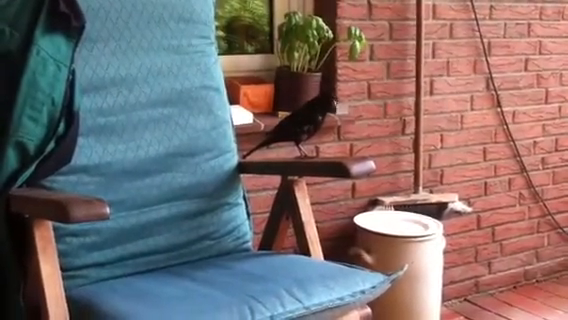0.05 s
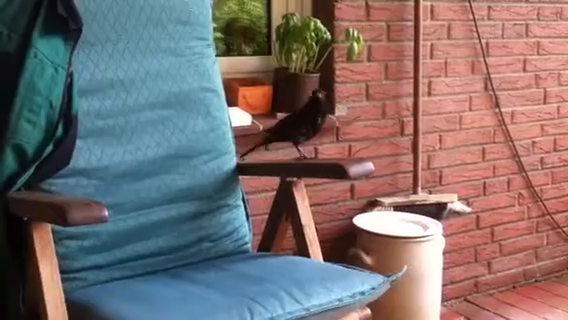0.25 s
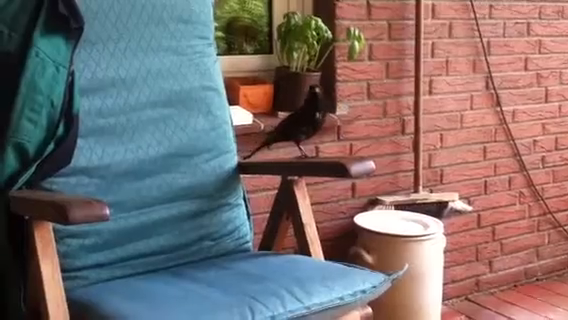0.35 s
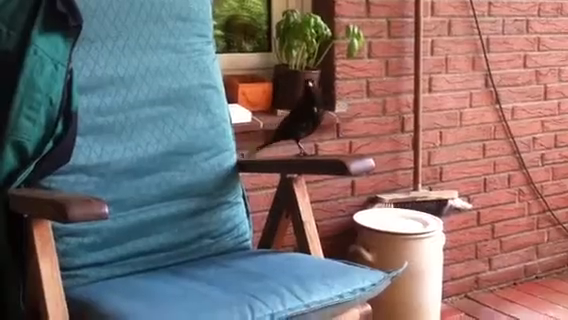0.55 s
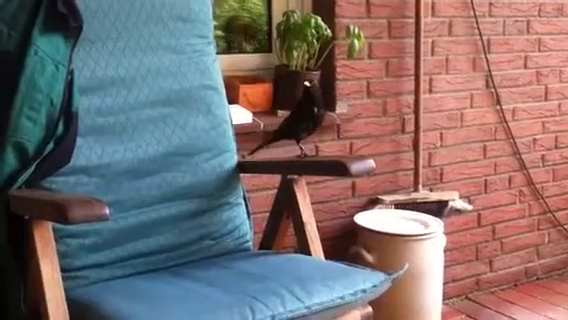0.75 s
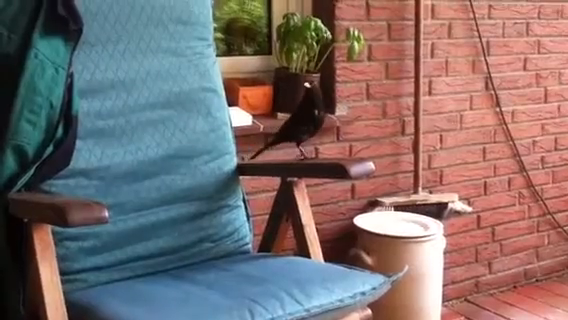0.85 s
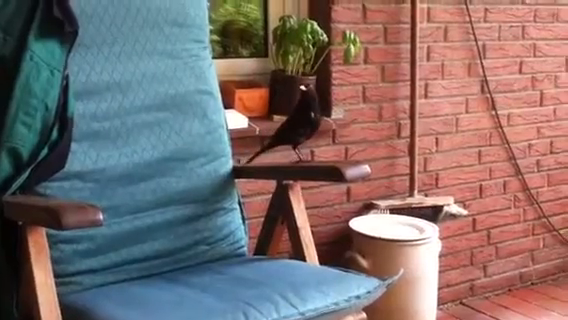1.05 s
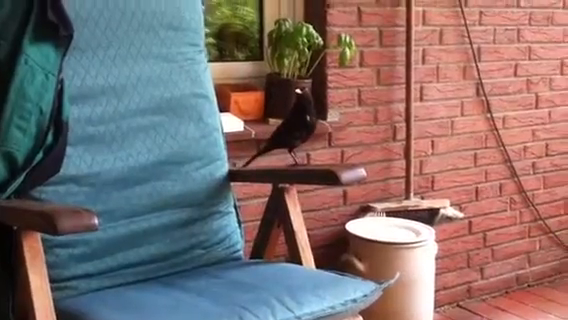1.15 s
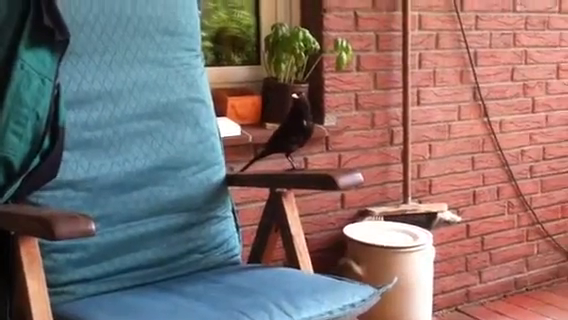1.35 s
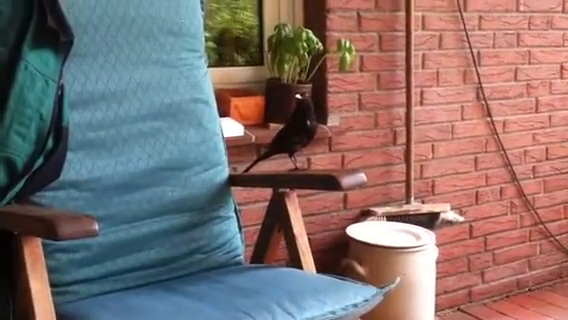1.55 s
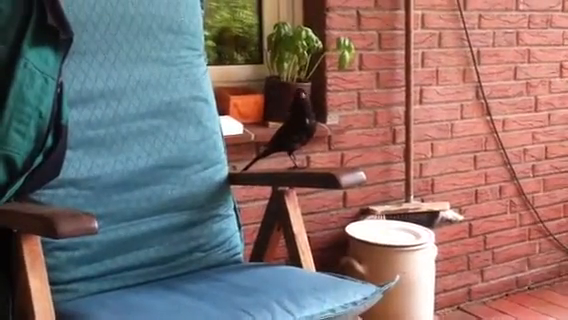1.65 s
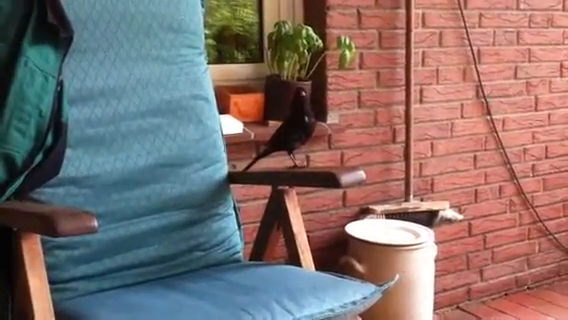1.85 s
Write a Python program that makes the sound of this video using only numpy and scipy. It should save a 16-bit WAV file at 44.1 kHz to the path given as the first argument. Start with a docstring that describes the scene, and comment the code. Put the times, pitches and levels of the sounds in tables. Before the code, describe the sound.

A nearby blackbird gives five sharp chucks in quick succession, each echoing briefly off a patio wall. Far off, a small bird trills faintly, then a thin high note and soft chips follow over quiet outdoor rumble and hiss.

```python
"""A quiet outdoor bed of rumble and hiss opens, with a small bird far off trilling in down-slurred notes.
From a quarter second in, a blackbird on a garden chair gives five sharp chucks: each a brief whistle
that arches and plunges into a rasp, thrown back by the brick wall and the patio. After the last chuck,
distant small birds add one thin high note and, as the trill stops, a closing run of chips."""
import sys
import numpy as np
from scipy import signal
from scipy.fft import rfft, irfft, next_fast_len
from scipy.io import wavfile
from scipy.ndimage import uniform_filter1d, map_coordinates

SR = 44100
rng = np.random.default_rng(int(sys.argv[2]) if len(sys.argv) > 2 else 0)


def to_wav(s):
    """Save 16-bit WAV."""
    ch = np.atleast_2d(s).T  # columns
    pcm = np.round(np.clip(ch, -1, 1) * 32767)  # PCM
    wavfile.write(sys.argv[1], SR, pcm.astype(np.int16))


N = 83790

# Colours of the rumble, the hiss and its swells. Each row: frequency in Hz, relative level in dB.
RUMBLE_COLOUR = [(25, -14), (60, -24), (95, -11.5), (125, -1), (190, 0), (300, -4.5), (500, -7.5),
                 (900, -10), (1800, -12), (2600, -14), (3400, -54)]
HISS_COLOUR = [(1800, -50), (2800, 3.5), (4500, 0.5), (7000, 0.5), (10000, -3), (15500, -3)]
SWELL_COLOUR = [(4000, -27), (7500, -8), (9500, -6), (11500, -4.5), (13500, -14), (15500, -12)]
# Faint swells of high hiss. Each row: peak time in seconds, half width in seconds, level in dB.
HISS_SWELLS = [(.15, .06, -70), (.45, 0.088, -70.5)]
# The trill's contour. Each row: time in seconds, centre pitch in Hz, drop per note in Hz, level in dB.
TRILL_CONTOUR = [(0, 3500, 1184, -72), (0.248, 3700, 1660, -76), (0.418, 4070, 1775, -67.5),
                 (.6, 4166, 1710, -65), (0.782, 3920, 1350, -65.5), (0.948, 3686, 710, -64),
                 (1.132, 3480, 650, -66.5), (1.238, 3393, 800, -75.5), (1.419, 3770, 1176, -69.5)]
# The blackbird's calls. Each row: start and length in seconds; crest, shoulder and end pitch in Hz;
# the share of the call at which each of those is reached; whistle level in dB, rasp against whistle
# in dB, the rasp's treble tilt in dB at TOP_HZ.
CHUCK_CALLS = [(0.239, 0.017, 2274, 1917, 1036, 0.53, 0.6, 0.98, -41, -18, -25),
               (0.3904, 0.025, 2460, 1977, 1662, 0.099, .52, 0.72, -39, -16, 4),
               (0.5555, .022, 2338, 1972, 1574, 0.27, 0.528, 0.776, -37, -17, 11),
               (0.7413, .018, 2441, 2297, 1460, 0.42, 0.49, 0.87, -39, -17, 6.5),
               (0.9178, 0.016, 2294, 2059, 1430, 0.17, 0.62, 0.83, -40.5, -15.5, 5)]
# Colour of the rasp. Each row: frequency in Hz, relative level in dB.
RASP_COLOUR = [(500, -18), (1200, 0.5), (3000, 9), (4200, 7.5), (5500, -1.5), (7000, -2), (9500, -8.5),
               (12500, 0), (15500, -13)]
# Slaps off nearby surfaces. Each row: delay in seconds, gain.
WALL_SLAPS = [(.0034, 0.46), (.0062, 0.38), (.0092, .35), (.0150, 0.37), (.0205, 0.2)]
# Pitches that linger between the patio walls. Each row: frequency in Hz, level in dB.
PATIO_RINGS = [(1460, -48.5), (1645, -48), (1702, -75), (1902, -49), (2078, -50), (2138, -49.5),
               (2259, -52.5), (2396, -50)]
# The high note's pieces, then the chips. Each row: start and length in seconds, first and last pitch
# in Hz, level in dB, buzz against tone in dB.
CHIP_NOTES = [(1.230, 0.023, 7190, 6160, -56.5, -8), (1.246, 0.022, 7150, 5370, -62.5, -1.5),
              (1.248, 0.027, 7220, 7130, -57.5, -38), (1.266, 0.029, 7150, 5970, -62.5, -26),
              (1.466, 0.023, 5020, 3650, -65.5, 0), (1.5, 0.024, 5450, 4030, -66.5, 1),
              (1.569, 0.016, 5500, 4120, -64.5, 4.5), (1.585, .025, 4830, 4830, -83, -22),
              (1.589, 0.068, 5370, 5480, -72.5, -9), (1.628, 0.036, 5480, 5200, -64, -15),
              (1.672, 0.013, 5480, 4010, -69.5, 10.5), (1.684, 0.016, 4830, 4700, -64.5, -17),
              (1.693, 0.072, 4220, 4200, -78, -16), (1.708, 0.042, 5410, 5390, -59.5, -14),
              (1.789, 0.02, 5430, 4100, -64, 0), (1.815, 0.039, 5520, 5396, -62, -14),
              (1.868, 0.023, 5480, 5380, -68, -20)]

RUMBLE_DB, HISS_DB, TOP_HZ = -70, -68.5, 15800
TRILL_NOTES_PER_S, TRILL_NOTE_S, TRILL_BUZZ_DB = 24, 0.035, -4.5
SLUR_WAVER_HZ, BUZZ_SCATTER_HZ = 47.3, 1070
FAR_DIRECT_DB, FAR_T60 = -9, 0.34
SCOOP_HZ, GLIDE_S = 270, 0.0019  # rise to the crest; rounding of the pitch turns
PEAK_SHARE, RELEASE_POWER = 0.5, 1.35  # how far into a chuck it peaks; shape of the fade
OVERTONE_DB, WAVER_HZ, FLUTTER_DB = -25, 37, 1.75
RASP_START_S, RASP_RISE_S, RASP_DECAY_S, RASP_WET_DB = 0.004, 0.0048, 0.011, 1.5
PATIO_DB, PATIO_T60, YARD_DB, YARD_T60, RING_T60 = -4.5, 0.19, -14, 0.5, 0.25


def amp(db):
    """Decibels to gain."""
    return 10 ** (np.asarray(db) / 20)


def add(out, start_s, x):
    """Mix x into out from start_s on."""
    i = max(0, round(start_s * SR))
    out[i:i + len(x)] += x[:max(0, len(out) - i)]


def noise(colour, size):
    """Noise of rms 1 coloured by (Hz, dB) points."""
    points_hz, db = np.transpose(colour)
    hz = np.fft.rfftfreq(size, 1 / SR)
    eq = amp(np.interp(np.log(hz + 1), np.log(points_hz), db))
    x = irfft(rfft(rng.standard_normal(size)) * eq, size)
    return x / np.sqrt(np.mean(x ** 2) + 1e-20)


def wobble(rate, size):
    """A smooth random curve, rate knots a second."""
    knots = rng.standard_normal(256)
    return map_coordinates(knots, [np.arange(size) * rate / SR], mode="wrap")


def phase(hz):
    """Running phase of a gliding pitch."""
    return 2 * np.pi * np.cumsum(hz) / SR


def tail(t60, delay_s, build_s):
    """Diffuse echoes of energy 1 that build up and die away."""
    t = np.arange(SR // 2) / SR
    build = 1 - np.exp(-np.maximum(t - delay_s, 0) / build_s)
    echoes = rng.standard_normal(len(t)) * amp(-60 * t / t60) * build
    return echoes / np.linalg.norm(echoes)


def outdoor_bed():
    """Steady outdoor rumble and a fine hiss that swells faintly at the top."""
    t = np.arange(N) / SR
    swells = sum(amp(db) * np.exp(-0.5 * ((t - peak) / width) ** 2) for peak, width, db in HISS_SWELLS)
    steady = amp(RUMBLE_DB) * noise(RUMBLE_COLOUR, N) + amp(HISS_DB) * noise(HISS_COLOUR, N)
    return steady + swells * noise(SWELL_COLOUR, N)


def slur(length, first_hz, last_hz, buzz_db, bend):
    """One whistled glide; a copy with fast pitch jitter gives it a buzzy edge."""
    u = np.linspace(0, 1, int(length * SR))
    hz = first_hz + (last_hz - first_hz) * u ** bend + SLUR_WAVER_HZ * wobble(441, len(u))
    buzz = amp(buzz_db) * np.sin(phase(hz + BUZZ_SCATTER_HZ * wobble(3000, len(u))))
    envelope = np.sqrt(2 * np.abs(np.sin(np.pi * u)))
    return envelope * (np.sin(phase(hz)) + buzz)


def far(x):
    """A distant note arrives mostly as garden echoes."""
    response = tail(FAR_T60, delay_s=0.0047, build_s=0.0027)
    response[0] += amp(FAR_DIRECT_DB)
    return signal.fftconvolve(x, response)


def distant_trill():
    """A small bird's fast falling notes; the run climbs, sinks and narrows, then lifts at the end."""
    out = np.zeros(N)
    times, *columns = np.transpose(TRILL_CONTOUR)
    for start in np.arange(0, times[-1], 1 / TRILL_NOTES_PER_S):
        hz, drop, db = (np.interp(start, times, column) for column in columns)
        note = slur(TRILL_NOTE_S, hz + drop / 2, hz - drop / 2, TRILL_BUZZ_DB, bend=0.98)
        add(out, start, amp(db) * far(note))
    return out


def chuck_whistle(u, hz, fall):
    """A fluttering whistle that gains an overtone as it falls; u runs 0 to 1 over the call."""
    angle = phase(hz + WAVER_HZ * wobble(529, len(u)))
    attack = np.sin(np.pi / 2 * np.clip(u / PEAK_SHARE, 0, 1))
    release = np.clip((1 - u) / (1 - PEAK_SHARE), 0, 1) ** RELEASE_POWER
    flutter = amp(FLUTTER_DB * wobble(418, len(u)))
    return attack * release * flutter * (np.sin(angle) + amp(OVERTONE_DB) * fall * np.sin(2 * angle))


def chuck_rasp(t, tilt_db):
    """A burst of noise that cuts in just after the whistle starts."""
    colour = [(hz, db + tilt_db * hz / TOP_HZ) for hz, db in RASP_COLOUR]
    age = np.maximum(t - RASP_START_S, 0)
    burst = (1 - np.exp(-age / RASP_RISE_S)) * np.exp(-age / RASP_DECAY_S)
    return noise(colour, len(t)) * burst


def patio(x, wet_db=0):
    """Direct sound, close wall slaps, the patio's short ring and the yard's faint longer one."""
    response = amp(PATIO_DB) * tail(PATIO_T60, delay_s=0.006, build_s=0.0037)
    response += amp(YARD_DB) * tail(YARD_T60, delay_s=0.022, build_s=0.014)
    t = np.arange(len(response)) / SR
    for hz, db in PATIO_RINGS:
        response += amp(db - 60 * t / RING_T60) * np.sin(2 * np.pi * (hz * t + rng.random()))
    response *= amp(wet_db)
    response[0] += 1
    for delay, gain in WALL_SLAPS:
        add(response, delay, np.array([gain]))
    return signal.fftconvolve(x, response)


def blackbird():
    """Each chuck scoops up, sags to a shoulder and plunges; whistle and rasp echo round the patio."""
    out = np.zeros(N)
    t = np.arange(2048) / SR
    body = int(0.051 * SR)  # the opening stretch that sets a chuck's level
    for (start, length, crest_hz, shoulder_hz, end_hz,
         crest_at, shoulder_at, end_at, db, rasp_db, tilt_db) in CHUCK_CALLS:
        u = t / length
        turns_hz = [crest_hz - SCOOP_HZ, crest_hz, shoulder_hz, end_hz]
        hz = np.interp(u, [0, crest_at, shoulder_at, end_at], turns_hz)
        hz = uniform_filter1d(hz, int(GLIDE_S * SR))
        fall = (crest_hz - hz) / (crest_hz - end_hz)
        whistle = patio(chuck_whistle(u, hz, fall))
        rasp = patio(chuck_rasp(t, tilt_db), RASP_WET_DB)
        chuck = whistle / whistle[:body].std() + amp(rasp_db) * rasp / rasp[:body].std()
        add(out, start, amp(db) * chuck)
    return out


def distant_chips():
    """Small birds whistle one thin high note, made of overlapping slurs, then a run of chips."""
    out = np.zeros(N)
    for start, length, first_hz, last_hz, db, buzz_db in CHIP_NOTES:
        add(out, start, amp(db) * far(slur(length, first_hz, last_hz, buzz_db, bend=1.375)))
    return out


def scene():
    """The mono mix: the bed, the blackbird up front, the small birds behind."""
    return (outdoor_bed() + blackbird() + distant_chips() + distant_trill())[None]


def record(dry):
    """A hard high cut at TOP_HZ on the whole mix."""
    size = next_fast_len(N + SR // 2)
    passband = np.fft.rfftfreq(size, 1 / SR) < TOP_HZ
    return irfft(rfft(dry, size) * passband, size)[:, :N]


dry = scene()
out = record(dry)
to_wav(out)
```